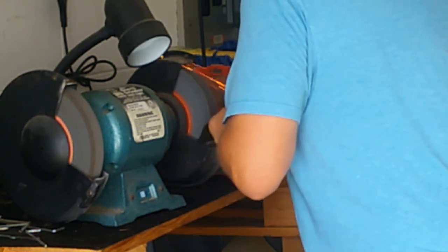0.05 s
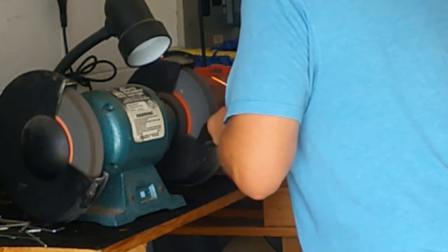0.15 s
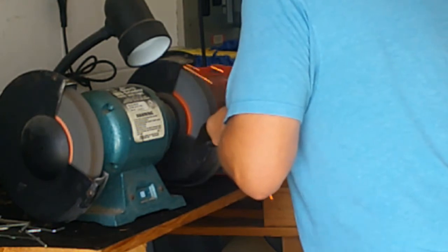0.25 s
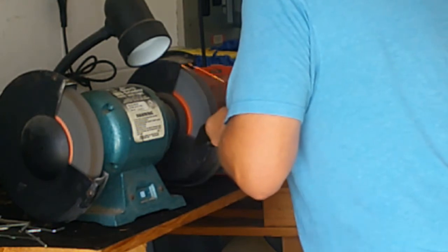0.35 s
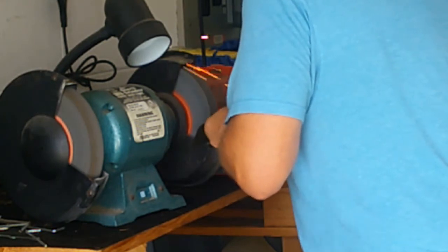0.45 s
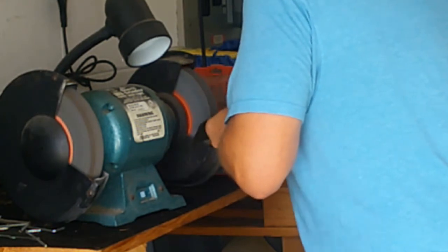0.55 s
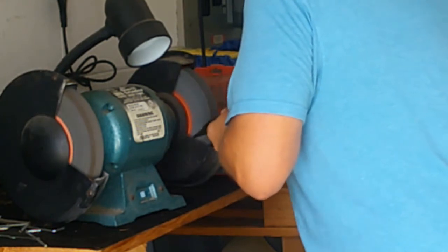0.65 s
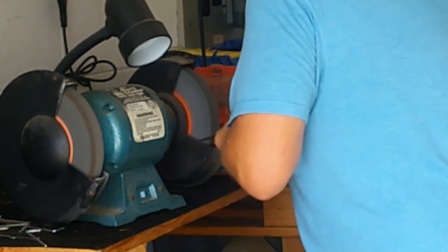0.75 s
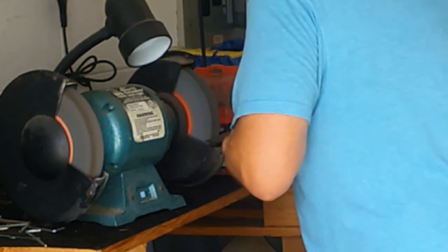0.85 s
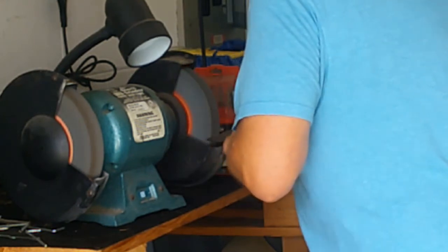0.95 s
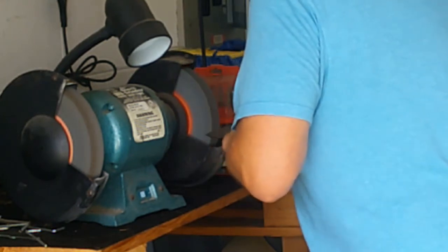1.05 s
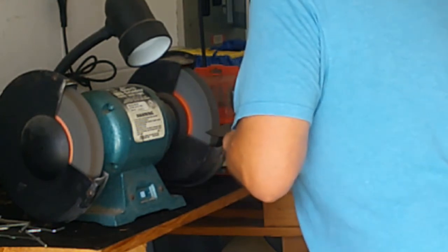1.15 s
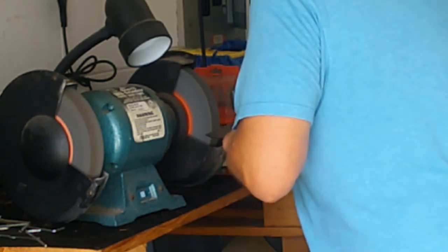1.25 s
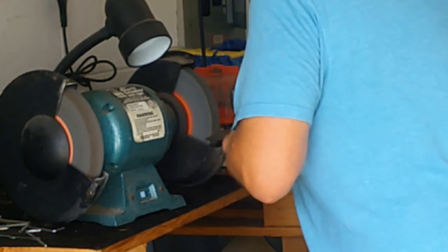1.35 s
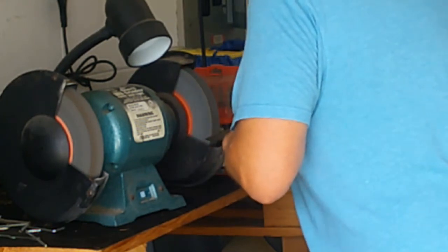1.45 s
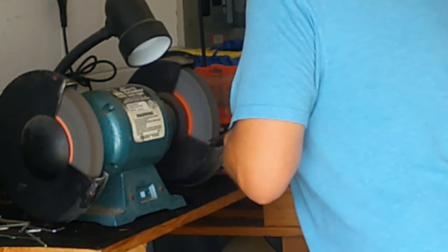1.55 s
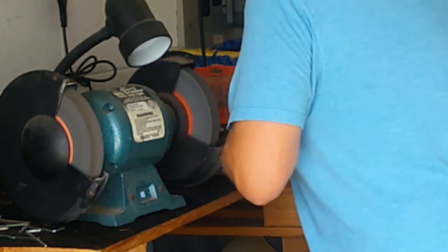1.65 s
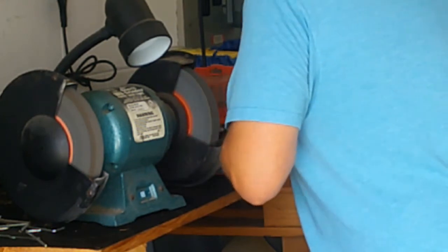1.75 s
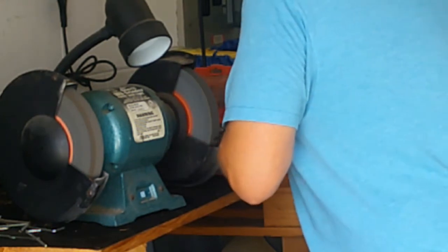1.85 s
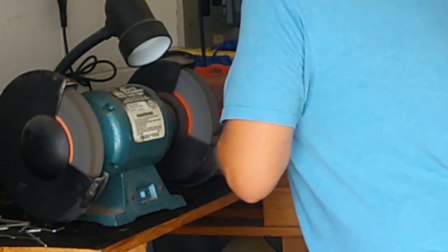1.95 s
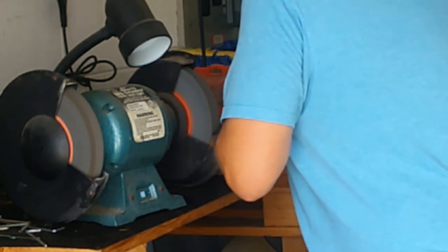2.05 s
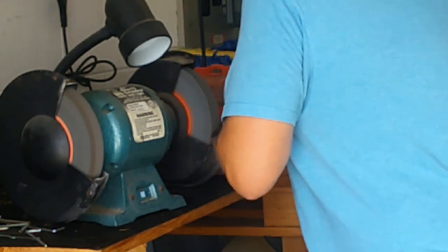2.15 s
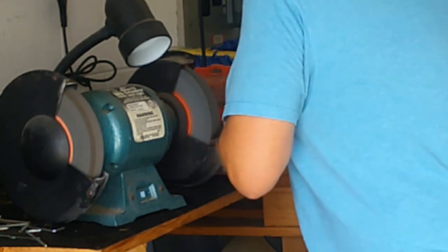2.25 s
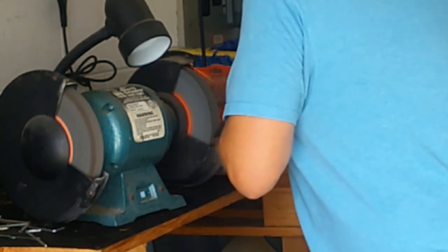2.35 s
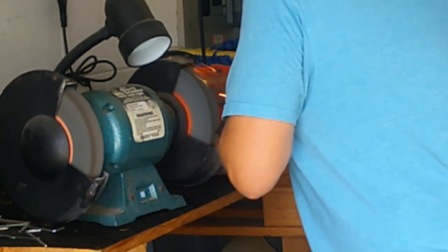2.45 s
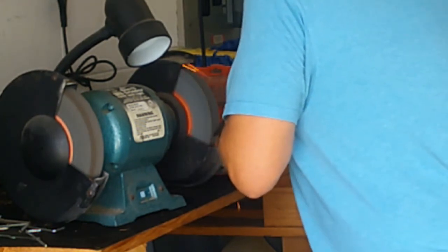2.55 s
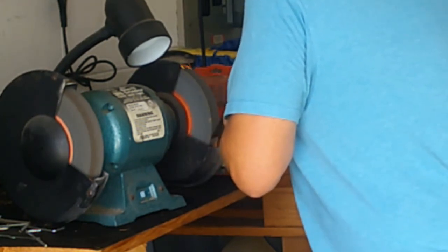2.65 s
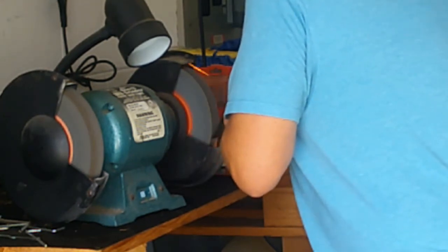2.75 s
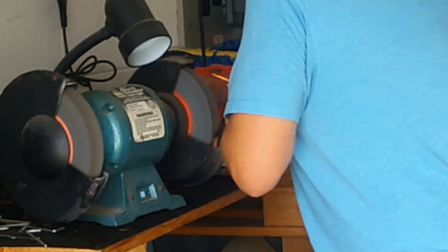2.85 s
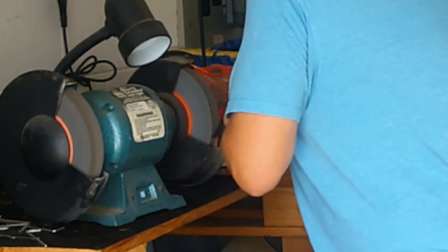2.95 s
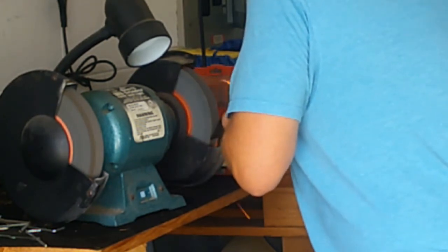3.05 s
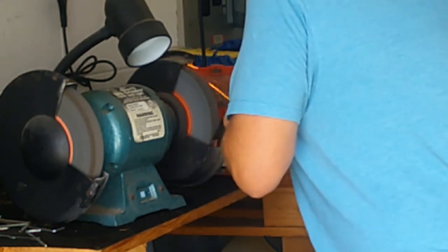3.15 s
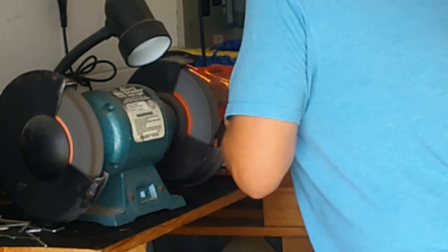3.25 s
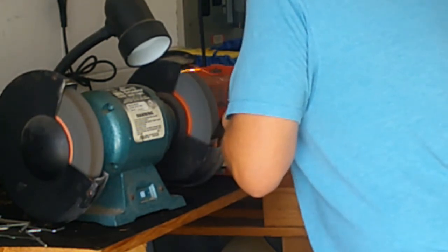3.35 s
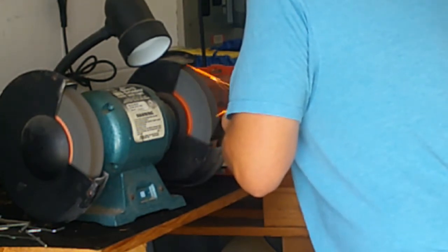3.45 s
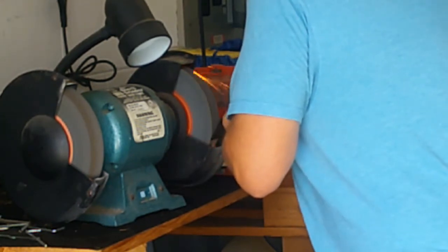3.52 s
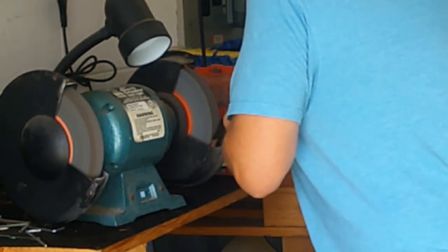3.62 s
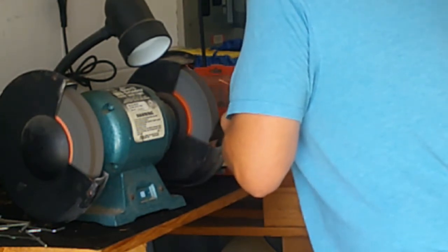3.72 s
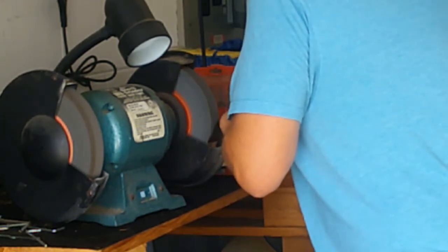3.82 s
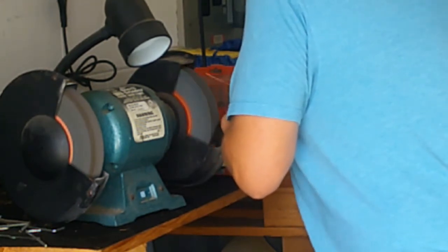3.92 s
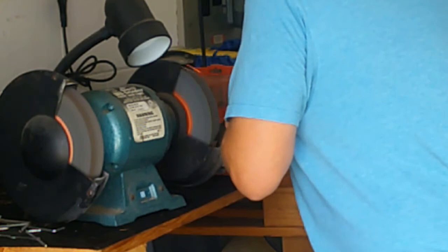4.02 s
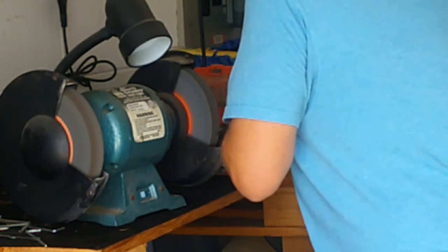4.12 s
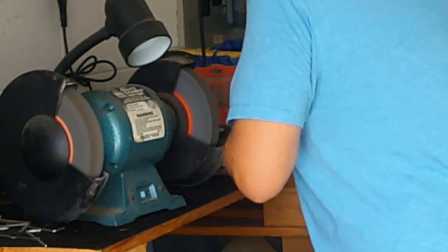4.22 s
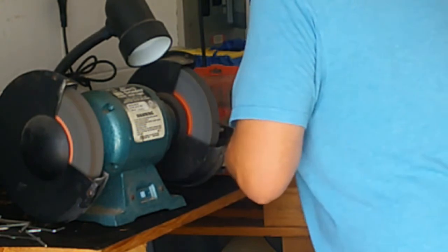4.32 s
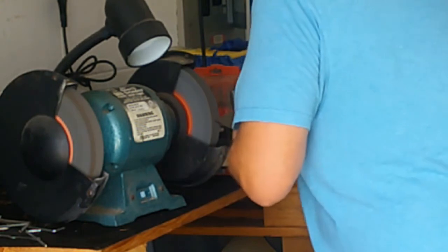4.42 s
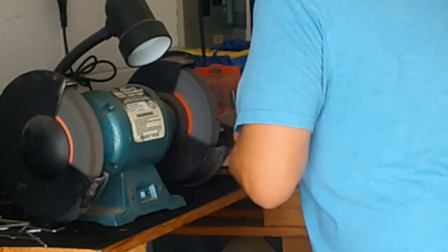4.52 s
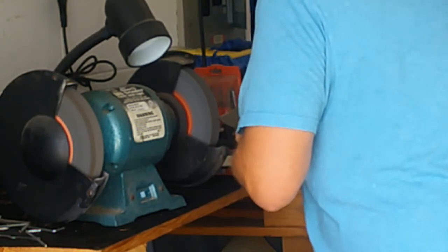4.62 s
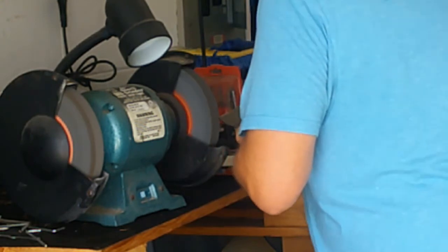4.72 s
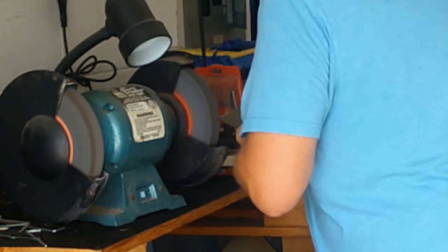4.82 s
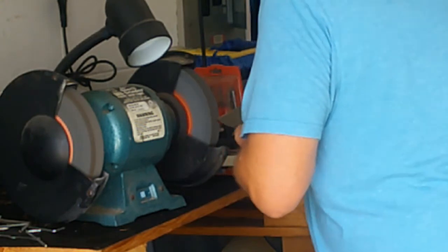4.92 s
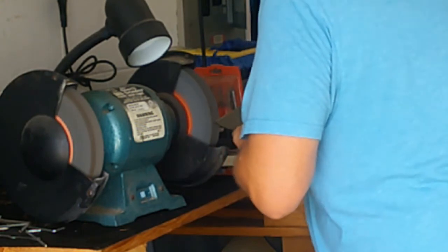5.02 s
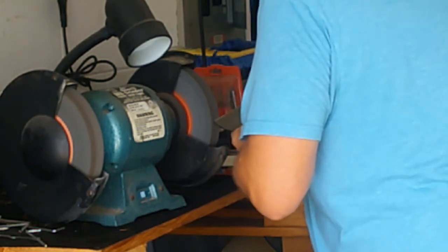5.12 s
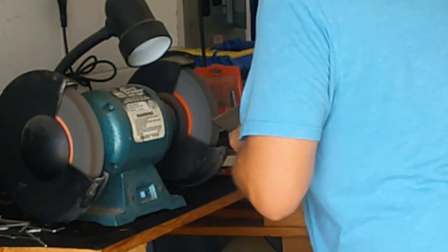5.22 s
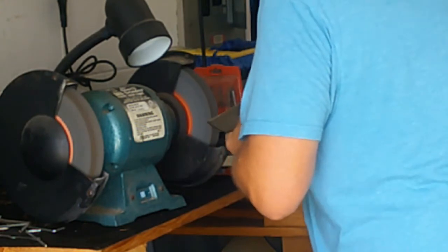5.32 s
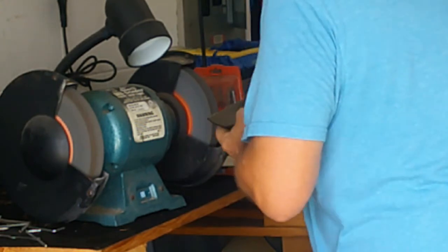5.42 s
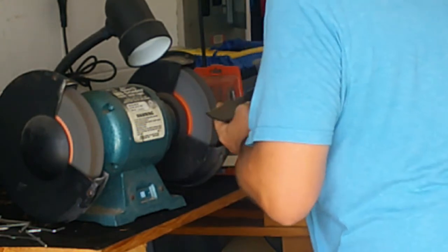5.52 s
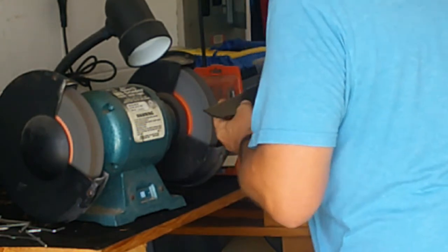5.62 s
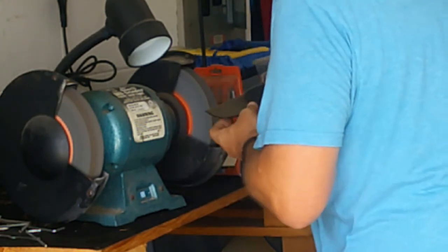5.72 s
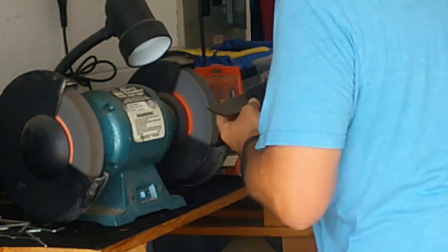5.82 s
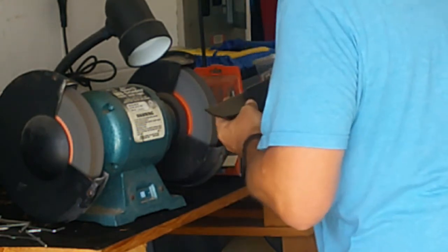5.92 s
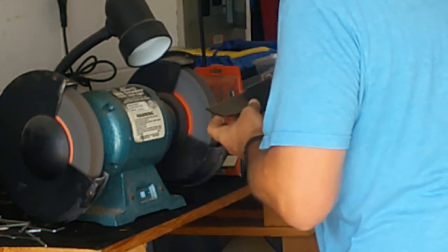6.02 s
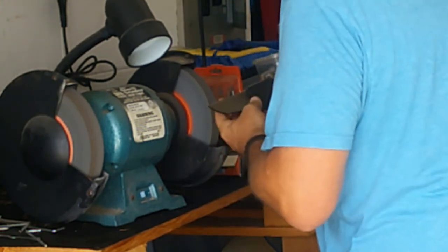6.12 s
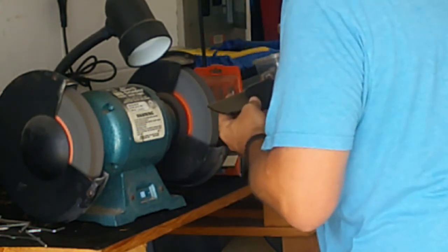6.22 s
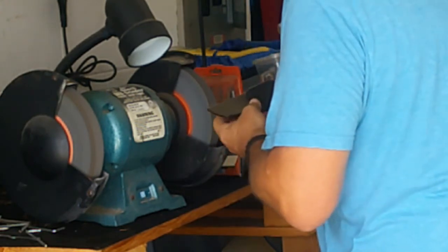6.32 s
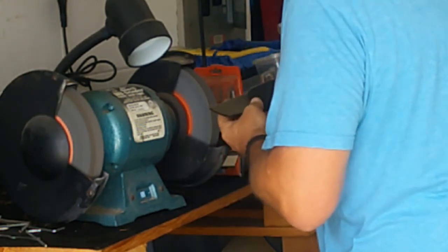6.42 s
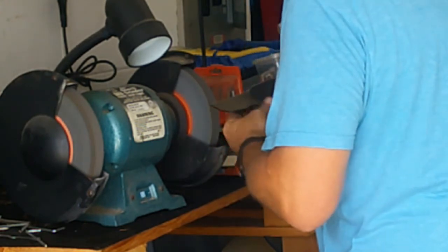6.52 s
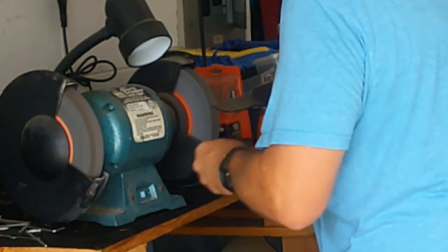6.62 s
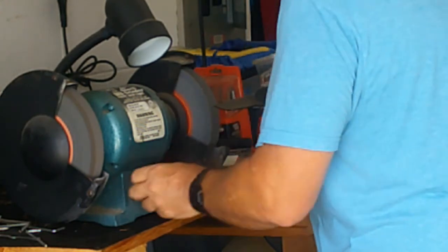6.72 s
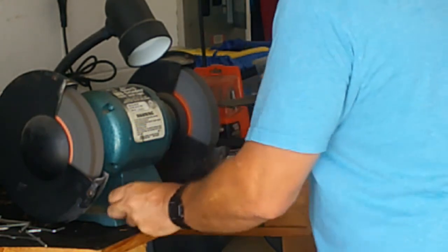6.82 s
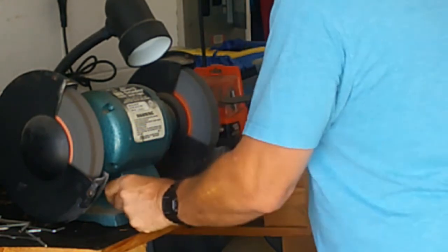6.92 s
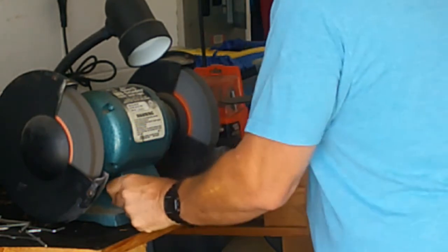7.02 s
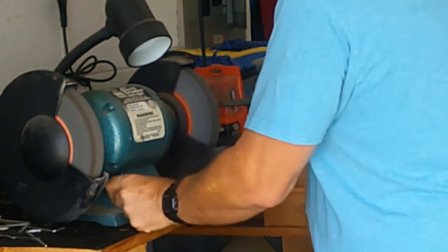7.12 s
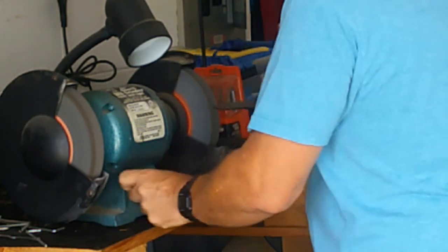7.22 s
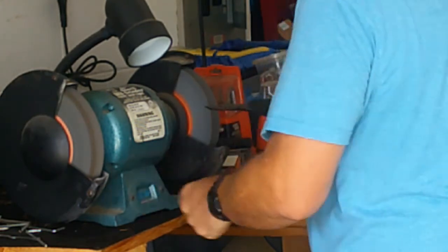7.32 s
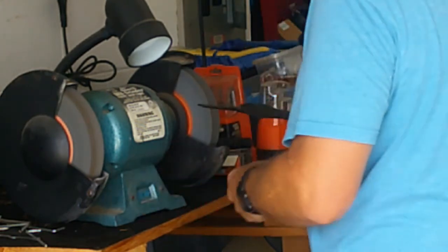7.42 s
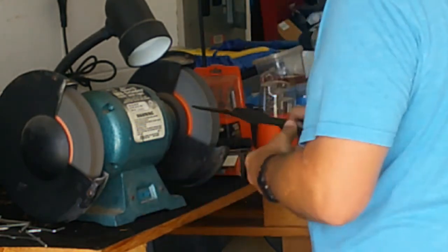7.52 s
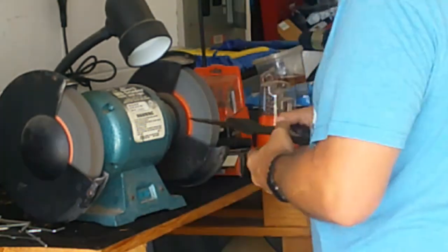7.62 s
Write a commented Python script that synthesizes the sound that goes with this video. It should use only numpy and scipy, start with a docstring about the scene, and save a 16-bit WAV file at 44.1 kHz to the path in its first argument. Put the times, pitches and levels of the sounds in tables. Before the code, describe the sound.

A steel blade rasps harshly against a spinning bench grinder wheel in two passes, then the motor hums alone and clicks off.

```python
"""A steel blade is drawn twice across a bench grinder's wheel in a small workshop. The wheel then idles,
is switched off with a snap and a dull knock, and starts to coast.
The rasp is rough noise that partly returns every turn of the wheel and makes the blade ring.
Under it, steady motor tones follow the wheel's speed, with a noise of air and bearings.
A small microphone of narrow band overloads on the rasp."""
import sys
import numpy as np
from scipy import signal
from scipy.io import wavfile
from scipy.ndimage import uniform_filter1d

SR = 44100
rng = np.random.default_rng(int(sys.argv[2]) if len(sys.argv) > 2 else 0)


def put_to_file(sound):
    """Save the sound as 16-bit audio at rate SR, in the file named by the first command-line argument."""
    columns = np.atleast_2d(sound).T  # one column per channel
    safe = np.clip(columns, -1, 1)
    whole_steps = np.round(safe * 32767)
    wavfile.write(sys.argv[1], SR, whole_steps.astype(np.int16))


N = 337806
T = np.arange(N) / SR  # time in seconds
OFF_S = 7.0906  # the motor is switched off
FULL_DB = -9  # pressure that counts as firm contact
FREE_TURNS_PER_S = 59.66  # wheel speed with nothing touching it
FINE = dict(nperseg=1024, noverlap=768)  # short frames, for the blade
BROAD = dict(nperseg=2048, noverlap=1536)  # longer frames, for the whir


def gain_of(db):
    """Turn decibels into a factor for the waveform."""
    return 10 ** (np.asarray(db) / 20)


def evened(x):
    """Scale to an rms of 1."""
    return x / np.sqrt(np.mean(abs(x) ** 2) + 1e-20)


def read(points, hz):
    """Read a table at any pitch, evenly along a logarithmic pitch scale."""
    pitch_hz, value = np.transpose(points)
    return np.interp(np.log(hz + 1), np.log(pitch_hz + 1), value)


def curve(points, t=T):
    """Read a table at any time, in straight lines between its rows."""
    return np.interp(t, *np.transpose(points))


def wander(shape, size):
    """Slow chance movement of rms 1 along the last axis; a larger size (in steps) is slower."""
    once = uniform_filter1d(rng.standard_normal(shape), size)
    return evened(uniform_filter1d(once, size))


def ring(hz, centre_hz, width):
    """Power of a resonance: 1 at its centre, half at the edges of its width."""
    return 1 / (1 + (2 * (hz - centre_hz) / width) ** 2)


def add(mix, s, sound):
    """Lay a sound into the mix from s seconds on."""
    part = mix[round(s * SR):][:len(sound)]
    part += sound[:len(part)]


# How the blade is pressed on the wheel, one table a pass:
# start_s, pressure_db, main_ring_hz, low_rings_db (below 2100 Hz), treble_db (above 2900 Hz)
PASSES = [
    [(0.0, -8, 2230, 1, -3.5), (.2, -7.5, 2304, 4, 0), (.4, -6, 2570, 3.5, -1.5),
     (.53, -9.5, 2370, 3.5, -1.5), (.555, -14, 2250, -4, -4), (.585, -12.5, 2370, -14, -9),
     (.6, -29.5, 2250, -16, -10), (.66, -43, 2360, -21, -4)],
    [(2.034, -49, 2280, 2, 2), (2.038, -17, 2320, -0.5, -1), (2.1, -10, 2270, -7.5, -3),
     (2.15, -17, 2270, -3.5, -5), (2.2, -10, 2220, -1.5, -1.5), (2.6, -8.5, 2285, 0.5, 2.5),
     (3.4, -8, 2290, 0, 1), (3.93, -9.5, 2243, -0.5, -1), (3.97, -7.5, 2310, 1, 2.5),
     (4.05, -6.5, 2270, 0, -1), (4.09, -15, 2230, 3.5, 1), (4.1, -25.5, 2300, 1, 3),
     (4.18, -43, 2270, -6, 12)],
]
# How the blade rings, one table a pass: pitch_hz, width_hz (where it is 6 dB down),
# then relative levels at_start_db, at_middle_db, at_end_db of the stroke
BLADE_RINGS = [
    [(216, 50, -26, -23.5, -26), (1050, 29.5, 1.5, -8.5, -2), (1395, 88, -18, -18, -12),
     (1575, 53, 0.5, -2.5, -18), (1940, 93, -9, -30, -12), (2318, 123, -11, -5, -4),
     (2525, 74, -18, -6, -6.5), (3360, 49, -4, -9.5, -7), (3670, 82, -27, -12, -7),
     (4224, 120, -1.5, -24, -26), (4580, 48, -13, -13.5, -18), (4950, 48, -11.5, -15, -15),
     (5490, 64, -12, -8, -11.5), (5670, 125, -20, -13.5, -3), (6080, 100, -11, -16, -12),
     (6580, 127, -1, -10.5, -10), (7190, 160, -7.5, -16, -26)],
    [(154, 130, -34, -31.5, -46), (1010, 140, -17, -21.5, -21), (1273, 62, -7.5, -5.5, -13.5),
     (1597, 147, -7.5, -10, -11.5), (1938, 137, -4, -10.5, -16), (2272, 57, -4, 3, -13.5),
     (2500, 200, -7.5, -5, -8), (3330, 180, -23, -18, -15), (3655, 135, -15, -12.5, -13.5),
     (4190, 130, -7.5, -14.5, -14), (4450, 57, -11.5, -27, -17), (5140, 90, -24, -20, -14),
     (5637, 100, -16, -21, -23), (6020, 130, -12, -12, -10.5), (6560, 240, -13, -12.5, -12),
     (6800, 100, -11, -68, 1.5), (7180, 50, -5.5, -15.5, -1.5)],
]
# Grit noise between the rings: pitch_hz, relative_level_db (per Hz)
RASP = [(25, -47), (150, -33), (500, -26), (1000, -27), (1850, -23), (2100, -22), (2700, -17.5),
        (3200, -19), (4300, -24), (4550, -29.5), (5500, -22.5), (6500, -31), (7600, -20.5)]
UNSTEADY_DB, RING_DRIFT_HZ = 0.46, 12  # rms of the hand's unsteadiness and of the main ring's drift
AGAIN_LOST_PER_DB = 0.1  # share of grit no longer met again, per dB of lighter contact
SKIP_PER_DB, HIGH_SPOT_TURNS = 0.6, -0.083  # once-a-turn swing: dB per dB lighter; where it bounces most
RUMBLE_HZ, RUMBLE_BURST_DB = 540, 2.5  # below this the blade shudders without repeating


def grind(rows, rings, again):
    """One pass: grit force coloured by blade rings that swell and fade as the blade slides."""
    s, pressure_db, main_hz, low_db, treble_db = np.transpose(rows)
    t = np.arange(s[0], s[-1], 1 / SR)
    turns = np.interp(t, T, np.cumsum(speed()) / SR)
    press_db = np.interp(t, s, pressure_db)
    light_db = np.clip(FULL_DB - press_db, 0, 10)
    force = grit(turns, again - AGAIN_LOST_PER_DB * light_db)
    hz, at, z = signal.stft(force, SR, **FINE)
    hz = hz[:, None]
    stroke = 2 * at / at[-1]  # 0 at the start, 1 in the middle, 2 at the end
    at = at + s[0]

    # Low down, fresh noise takes the place of the repeating grit.
    fresh = 1 / (1 + (hz / RUMBLE_HZ) ** 4)
    shudder = signal.stft(rng.standard_normal(len(t)), SR, **FINE)[2]
    shudder *= gain_of(RUMBLE_BURST_DB * wander(len(at), size=4))
    z = np.sqrt(1 - fresh) * z + np.sqrt(fresh) * shudder

    # Add up the power of the rasp, the main ring and the other rings.
    swell_db = 1.18 * wander((len(rings), len(at)), size=20)
    centre_hz = np.interp(at, s, main_hz) + RING_DRIFT_HZ * wander(len(at), size=20)
    main_ring = held(z, ring(hz, centre_hz, 117.0) ** 2)
    power = gain_of(2 * read(RASP, hz)) + gain_of(2 * -1.5) * main_ring
    for (ring_hz, width, *db), swell in zip(rings, swell_db):
        ring_db = np.interp(stroke, range(3), db) + swell
        power = power + gain_of(2 * ring_db) * held(z, ring(hz, ring_hz, width) ** 2)
    tilt_db = (hz < 2100) * np.interp(at, s, low_db) + (hz > 2900) * np.interp(at, s, treble_db)
    power *= gain_of(2 * tilt_db)

    # The colour is evened out in each frame, so that pressure sets the loudness.
    coloured = z * np.sqrt(power / power.mean(0))
    rasp = signal.istft(coloured, SR, **FINE)[1][:len(t)]
    # A light blade is thrown off once a turn.
    skip_db = SKIP_PER_DB * light_db * np.cos(2 * np.pi * (turns - HIGH_SPOT_TURNS))
    hand_db = UNSTEADY_DB * wander(len(t), size=2000)
    return s[0], gain_of(press_db + skip_db + hand_db) * evened(rasp)


def grit(turns, again):
    """The rough rim passes the blade every turn; part of its pattern is new each time."""
    rim = rng.standard_normal((int(turns[-1]) + 2, 750))  # one row a turn, 750 points around
    keep = np.clip(np.interp(np.arange(len(rim)), turns, again), 0, .98)
    for k in range(1, len(rim)):
        rim[k] = keep[k] * rim[k - 1] + np.sqrt(1 - keep[k] ** 2) * rim[k]
    slip = 0.0006 * wander(len(turns), size=500)  # the contact point trembles, in turns
    rubbed = np.interp((turns + slip) * 750, np.arange(rim.size), rim.ravel())
    chips = 0.32 * rng.standard_normal(len(turns))  # torn-off steel never repeats
    chatter_db = 0.2 * wander(len(turns), size=300)
    return (rubbed + chips) * gain_of(chatter_db)


STEADY = 0.45  # how far a ring evens out the chance swells in its drive, 0-1


def held(z, shape):
    """Power of a ring that feeds itself and so rides out the swells of its drive."""
    drive = (shape * abs(z) ** 2).sum(0) / shape.sum(0) / np.mean(abs(z[:200]) ** 2)
    return shape / (drive + 0.085) ** STEADY


def contact():
    """Share of firm contact between blade and wheel, 0-1, from the pressure."""
    total = 0
    for rows in PASSES:
        start_s, pressure_db = np.transpose(rows)[:2]
        press_db = np.interp(T, start_s, pressure_db, left=-99, right=-99)
        total = total + np.minimum(gain_of(press_db - FULL_DB), 1)
    return total


DRAG_TURNS_PER_S, WHEEL_LAG_S = 1.3, .42  # speed lost in firm contact, and how slowly it follows
COAST_TURNS_PER_S2 = 2.1  # slowing after switch-off


def speed():
    """Turns a second: the heavy wheel lags behind the blade's drag, and coasts down after switch-off."""
    keep = np.exp(-1 / (WHEEL_LAG_S * SR))
    drag = signal.lfilter([1 - keep], [1, -keep], contact() ** 2, zi=[keep])[0]
    coast = COAST_TURNS_PER_S2 * np.maximum(T - OFF_S, 0)
    return FREE_TURNS_PER_S - DRAG_TURNS_PER_S * drag - coast


# Rocker switch: pitch_hz, relative_level_db, t60_s (time to fade by 60 dB)
SWITCH = [(630, -17, 0.037), (1410, -14.5, 0.032), (1590, -5.5, 0.015), (2490, 2, 0.012),
          (3630, 1.5, 0.0045), (6000, -5.5, 0.0032)]
# Hand on the bench: start_s, relative_level_db, pitch_hz, t60_s (time to fade by 60 dB)
KNOCKS = [(7.355, -27, 170, 0.039), (7.354, -33, 330, 0.037)]


def hand():
    """The switch snaps, then a dull knock: short tones that start fast and die away."""
    out, t = np.zeros(N), T[:4000]
    snap = sum(gain_of(db - 60 * t / t60) * np.sin(2 * np.pi * hz * t) for hz, db, t60 in SWITCH)
    add(out, OFF_S, gain_of(-4.5) * snap * np.minimum(t / 0.0005, 1))
    for s, db, hz, t60 in KNOCKS:
        knock = gain_of(db - 60 * t / t60) * np.sin(2 * np.pi * hz * t)
        add(out, s, knock * np.minimum(t / 0.0048, 1))
    return out


# Motor tones: shaft_order (cycles per turn), added_hz (fixed shift in Hz)
TONES = [(3, 0), (5, 0), (0, 366), (7, 0), (8, 0), (9, 0), (9.83, 0), (10, 0), (11.83, 0), (12, 0),
         (13.72, 0), (15, 0), (16, 0), (20, -120), (18, 0), (20, 0), (21, 0), (20, 120), (20, 240)]
# Their levels before they waver, in the same order: powered_db, coasting_db
TONES_DB = [(-63.5, -64.5), (-58.5, -59), (-58.5, -67), (-65.5, -69), (-49, -51.5), (-52, -55), (-60, -58),
            (-56, -39), (-55.5, -52), (-53, -49), (-57.5, -56), (-55, -56), (-53.5, -53), (-55.5, -75),
            (-58, -47), (-40.5, -37), (-50.5, -57), (-34.5, -46), (-57, -75)]
# The whine of the shifted tones sinks as the arm reaches past: time_s, change_db
WHINE = [(6.15, 0), (6.35, -3)]
BEARING_ORDER, BEARING_DB = 10.84, -33  # cycles per turn; level at the top of its swell at free speed
SLIP_DB = -5.5  # bearing tone: dB per turn a second lost
SWELL_DB, SWELL_S, SWELL_DIP_S = 8, .69, 1.56  # depth of the swell, its period, time of one dip
LOADED_ORDER, LOADED_FROM_S, LOADED_TO_S = 11, 2.31, 3.52  # this order sings out in mid-stroke
LOADED_DB, LOADED_WAVER_DB = -29.5, 1.5


def motor():
    """Shaft orders, rotor-slot tones beating with the mains field, and a slowly swelling bearing tone."""
    rate = speed()
    turns = np.cumsum(rate) / SR
    live = np.clip(1 - (T - OFF_S) / 0.082, 0, 1)  # the field dies away

    swell = abs(np.sin(np.pi * (T - SWELL_DIP_S) / SWELL_S))
    bearing_db = BEARING_DB - SWELL_DB * (1 - swell) + SLIP_DB * (FREE_TURNS_PER_S - rate)
    wobble = 0.4 * wander(N, size=1500)  # radians
    out = gain_of(bearing_db) * np.sin(2 * np.pi * BEARING_ORDER * turns + wobble)

    loaded_db = LOADED_DB + LOADED_WAVER_DB * wander(N, size=2500)
    singing = np.clip(np.minimum(T - LOADED_FROM_S, LOADED_TO_S - T) / 0.022, 0, 1)
    out += singing * gain_of(loaded_db) * np.sin(2 * np.pi * LOADED_ORDER * turns)

    for (order, added_hz), (on_db, off_db) in zip(TONES, TONES_DB):
        waver_db = 1.98 * np.interp(T, T[::500], wander(len(T[::500]), size=12))
        waver_db += curve(WHINE) * (added_hz != 0)
        phase = order * turns + added_hz * T + rng.random()  # in cycles
        level_db = live * on_db + (1 - live) * off_db + waver_db
        out += gain_of(level_db) * np.sin(2 * np.pi * phase)
    return np.sqrt(2) * out  # makes the levels rms levels


# Air and bearing noise: pitch_hz, relative_level_db (per Hz)
WHIR = [(25, -28), (100, -15.5), (300, -15.5), (600, -5.5), (800, -7.5), (1200, -5.5), (1500, -8),
        (1900, -10.5), (2800, -15.5), (3600, -22), (4500, -25.5), (5500, -23), (6300, -17), (7400, -27)]
# Casing and guard resonances: pitch_hz, width_hz (where it is 6 dB down), relative_level_db
CASING = [(1015, 67, -1.5), (1698, 76, 3), (2088, 34, 4), (2180, 58, -8), (2450, 62, -5), (2676, 24, -3.5),
          (3460, 35, -7.5), (5750, 190, -18.5)]
# Loudness of the whole whir: time_s, level_db
WHIR_LEVEL = [(0, -35), (5.3, -35), (6.2, -37), (7.1, -36), (7.66, -38)]


def whir():
    """Noise of air and bearings through the casing, pulsing a little with the mains field."""
    hz, at, z = signal.stft(rng.standard_normal(N), SR, **BROAD)
    power = gain_of(2 * read(WHIR, hz)) * (hz < 8000)
    power = power + sum(gain_of(2 * db) * ring(hz, f, w) ** 2 for f, w, db in CASING)
    patches = gain_of(2.2 * wander(z.shape, size=5))  # each narrow band flickers on its own
    noise = signal.istft(z * np.sqrt(power)[:, None] * patches, SR, **BROAD)[1][:N]
    pulse = 1 + 0.051 * np.sin(2 * np.pi * 120 * T) * (T < OFF_S)
    return gain_of(curve(WHIR_LEVEL)) * evened(noise) * pulse


# How long the room rings: pitch_hz, t60_s (time to fade by 60 dB)
ROOM = [(200, 0.19), (2500, 0.28), (3500, 0.11), (7500, 0.25)]


def workshop(x):
    """Short diffuse tail of fading noise, with a fade time for each pitch."""
    hz, t, z = signal.stft(rng.standard_normal(SR // 2), SR, nperseg=256)
    fade_db = -60 * t / read(ROOM, hz)[:, None]
    tail = signal.istft(z * gain_of(fade_db), SR, nperseg=256)[1]
    tail *= T[:len(tail)] > .004  # nothing comes back in the first 4 ms
    return signal.fftconvolve(x, tail / np.linalg.norm(tail))[:N]


def scene():
    """Blade and hand sound in the room over the running motor."""
    blade = np.zeros(N)
    grit_met_again = [0.843, 0.68]  # share met again next turn in firm contact, one a pass
    for rows, rings, again in zip(PASSES, BLADE_RINGS, grit_met_again):
        add(blade, *grind(rows, rings, again))
    into_room = blade + gain_of(-8.0) * hand()
    room = gain_of(-11.0) * workshop(into_room)
    return (blade + hand() + room + motor() + whir())[None]


MIC_HZ, SAMPLING_HZ, EDGE_HZ = 7330, 16000, 15850  # microphone's top, mirror's carrier, final top


def record(dry):
    """Narrow microphone band, a faint mirror image of its top edge, hard overload, band limit."""
    mic_filter = signal.firwin(801, MIC_HZ, window=("kaiser", 10), fs=SR)
    narrow = signal.oaconvolve(dry, mic_filter[None], "same")
    mirror = narrow * np.cos(2 * np.pi * SAMPLING_HZ * T)
    leak_filter = signal.butter(4, [8700, 8820], "bandpass", fs=SR, output="sos")
    narrow = narrow + gain_of(-19.) * signal.sosfilt(leak_filter, mirror)
    loud = np.clip(narrow, -.74, .74)
    edge_filter = signal.firwin(511, EDGE_HZ, window=("kaiser", 9), fs=SR)
    return signal.oaconvolve(loud, edge_filter[None], "same")


dry = scene()
out = record(dry)
put_to_file(out)
```